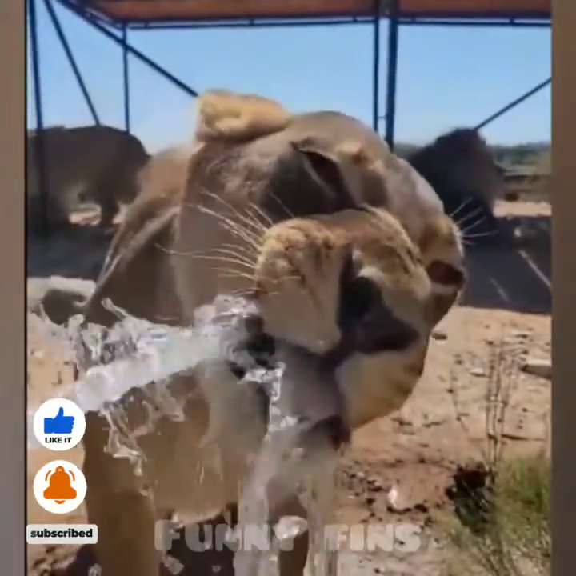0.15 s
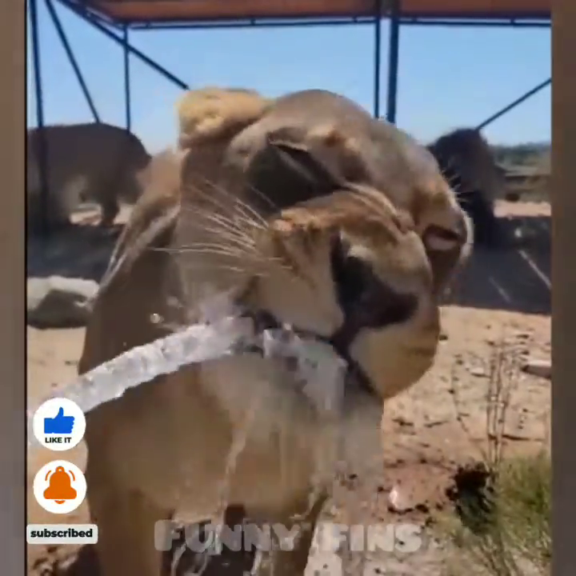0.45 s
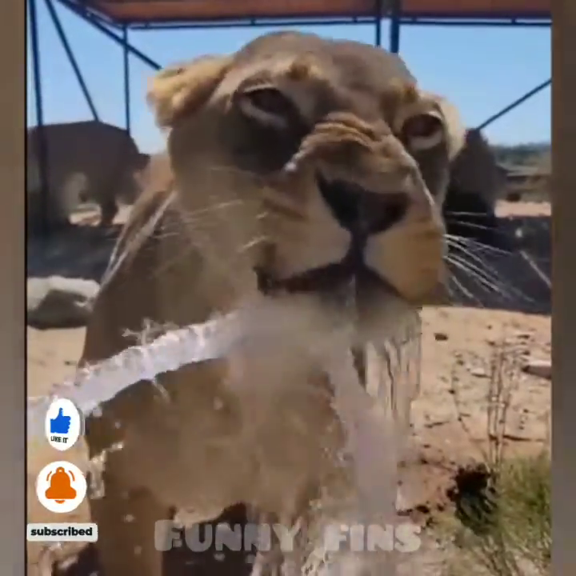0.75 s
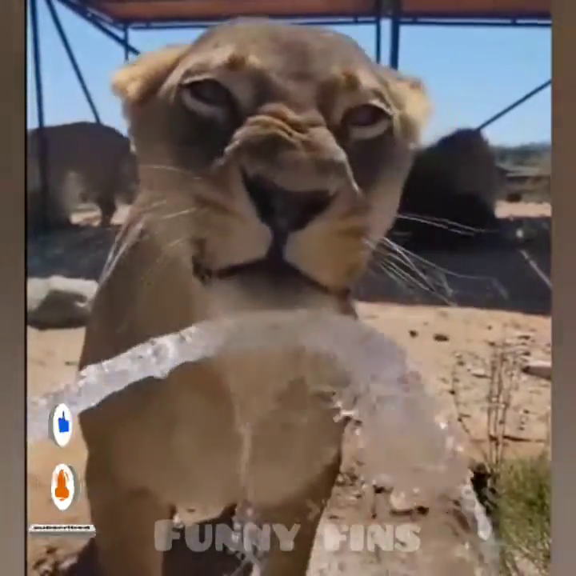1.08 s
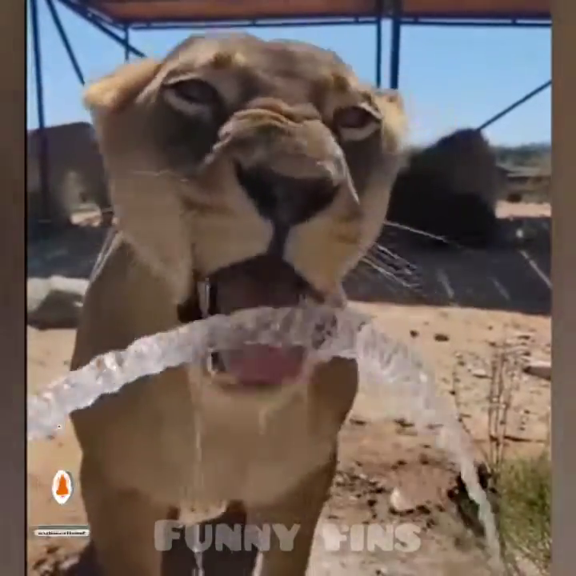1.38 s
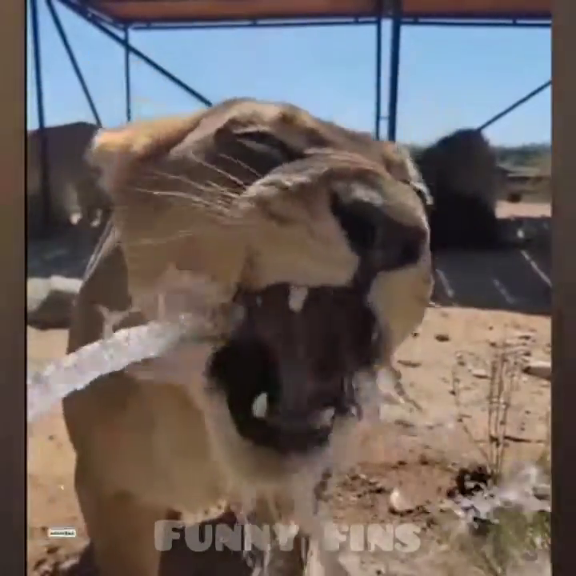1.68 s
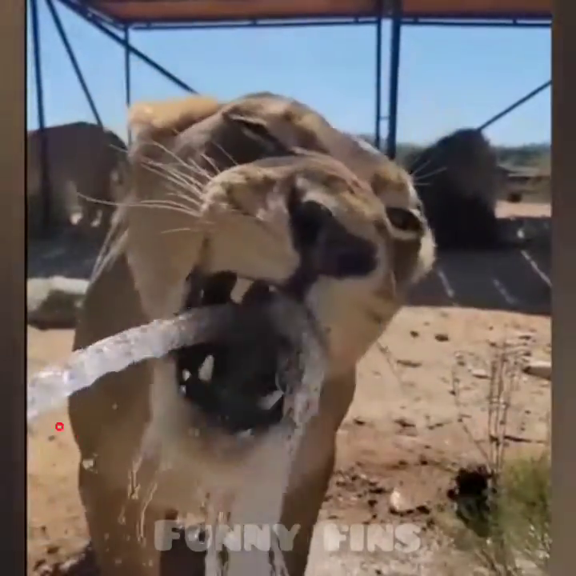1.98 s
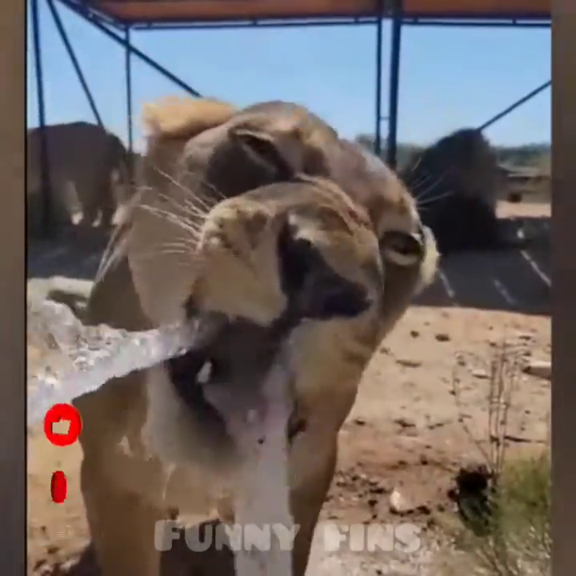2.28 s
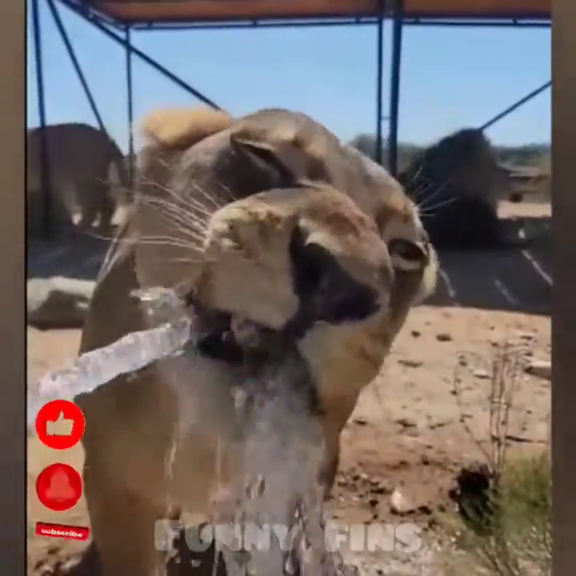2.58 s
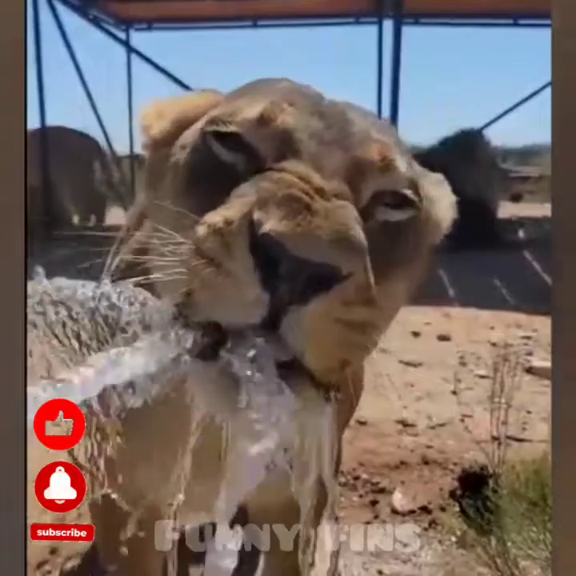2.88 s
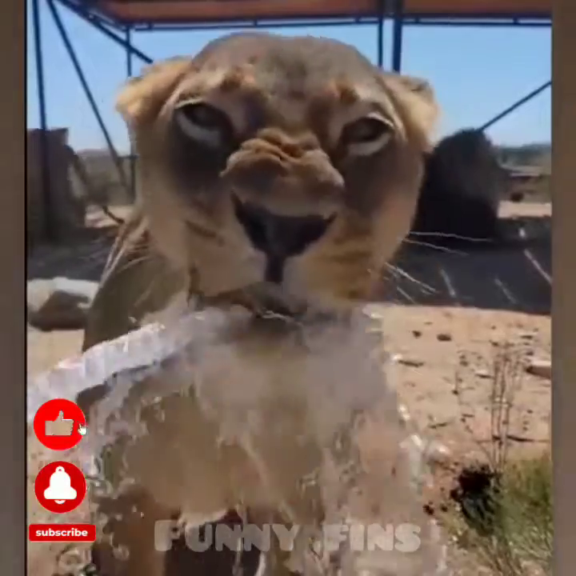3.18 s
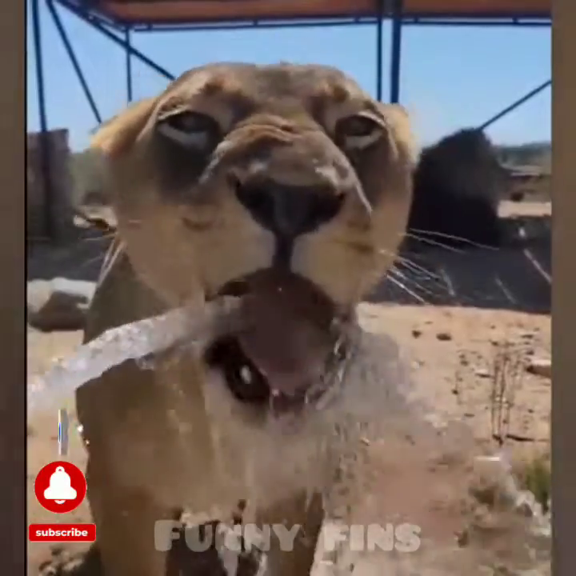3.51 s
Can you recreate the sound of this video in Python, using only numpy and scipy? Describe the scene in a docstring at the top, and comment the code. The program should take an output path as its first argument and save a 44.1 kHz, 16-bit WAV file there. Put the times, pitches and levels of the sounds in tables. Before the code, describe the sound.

A hose jet splashes unevenly on a lioness's muzzle, close and outdoors: hissing spray, wet ticks and sharp slaps throughout, gurgles early, a hollow ringing mouthful midway, then more gurgling and splatter, leaning right.

```python
"""A hose jet plays on the wet muzzle of a lioness outdoors and bursts into a mist of hissing spray.
Wet ticks and small ringing bubbles splatter on fur and lips, and larger bubbles gurgle in her cheek.
For a while filtered drops ring her open mouth like a hollow; lumps of water slap as ringing noise bursts.
Single bubbles plop with rising pitch and soft thuds sag, over a faint low rumble and a wavering hum."""
import sys
import numpy as np
from scipy import signal
from scipy.fft import rfft, irfft
from scipy.io import wavfile

SR = 44100
rng = np.random.default_rng(int(sys.argv[2]) if len(sys.argv) > 2 else 0)


def log_audio(samples):
    """Write samples as a 16-bit WAV file to the path given in sys.argv[1]."""
    # one column per channel
    frames = np.atleast_2d(samples).T
    # limit to full scale, then quantise
    limited = np.clip(frames, -1, 1)
    pcm = np.round(limited * 32767).astype(np.int16)
    wavfile.write(sys.argv[1], SR, pcm)


N = 160965
T = np.arange(N) / SR


def amp(db):
    """Turns decibels into a gain."""
    return 10 ** (np.asarray(db) / 20)


def unit(x):
    """Scales a sound to an average strength (rms) of 1."""
    return x / np.sqrt(np.mean(x ** 2) + 1e-20)


def curve(table, axis=1):
    """Draws straight lines through one column of a time table, giving a value for every sample."""
    rows = np.array(table)
    return np.interp(T, rows[:, 0], rows[:, axis])


def spectrum(points):
    """Joins the points of a frequency table, giving a value for every frequency bin."""
    hz, value = np.transpose(points)
    bins = np.fft.rfftfreq(N, 1 / SR)
    return np.interp(np.log(bins + 1), np.log(hz), value)


def add(mix, start_s, sound):
    """Mixes a sound in at a given time, cutting it off at the end of the mix."""
    part = mix[:, round(start_s * SR):][:, :sound.shape[-1]]
    part += sound[..., :part.shape[1]]


def coloured(x, colour):
    """Makes some frequencies louder and others softer, then scales to rms 1."""
    return unit(irfft(rfft(x) * amp(spectrum(colour)), N))


# how alike the left and right noise are: (frequency [Hz], likeness [0 to 1])
EAR_LIKENESS = [(60, 0.94), (130, 0.99), (290, 0.51), (640, 0.42), (3100, 0.32), (6820, 0.49),
                (15000, 0.82)]


def noise(colour, envelope=1):
    """Shapes stereo noise in time, makes the ears partly alike, then colours it."""
    left, other = rfft(rng.standard_normal((2, N)) * envelope)
    alike = np.clip(spectrum(EAR_LIKENESS), 0, 1)
    right = alike * left + np.sqrt(1 - alike ** 2) * other
    return coloured(irfft(np.array([left, right]), N), colour)


def wander(hz):
    """Drifts smoothly at random, with little movement faster than the given rate."""
    bins = np.fft.rfftfreq(N, 1 / SR)
    return unit(irfft(rfft(rng.standard_normal(N)) / (1 + (bins / hz) ** 4), N))


def drops(per_s, spread_db):
    """Scatters impacts at random times; a positive spread makes a few large, a negative one a few small."""
    hits = rng.random(N) < per_s / SR
    return hits * amp(spread_db * np.minimum(rng.exponential(1, N), 4))


def bubble(t, hz, decay_s, rise_per_s, phase=0):
    """A pocket of air rings and rises in pitch as it dies away."""
    swell = 1 - np.exp(-2 * t * hz)
    turns = hz * t * (1 + rise_per_s * t / 2)
    return swell * np.exp(-t / decay_s) * np.sin(2 * np.pi * turns + phase)


def bubbles(low_hz, high_hz, per_s, spread_db, cycles, glide, scatter, count=40):
    """Bubbles of many sizes ring at many pitches, each size with its own phase (radians) in each ear."""
    out = np.zeros((2, N))
    for hz in np.linspace(low_hz, high_hz, count):
        decay_s = cycles / hz * np.exp(rng.uniform(-0.47, 0.78))
        t = np.arange(0, 6 * decay_s, 1 / SR)
        phase = scatter * rng.standard_normal((2, 1))
        ring = bubble(t, hz, decay_s, glide / decay_s, phase) / np.sqrt(decay_s)
        hits = drops(per_s / count, spread_db)
        out += signal.oaconvolve(hits[None], ring, axes=1)[:, :N]
    return unit(out)


def resonate(x, hz, width_hz):
    """A hollow rings at a moving pitch: shift that pitch to zero, smooth twice, shift back."""
    turn = np.exp(2j * np.pi * np.cumsum(hz) / SR)
    r = np.exp(-np.pi * width_hz / SR)
    smooth = signal.lfilter([1], [1, -2 * r, r * r], x / turn)
    return unit((turn * smooth).real)


def patchy(x, depth_db, wide_hz, long_s):
    """The colour shifts in random patches of pitch and time as the water changes shape."""
    hz, t, z = signal.stft(x, SR, nperseg=1024, noverlap=768)
    along_hz = np.fft.fftfreq(len(hz), hz[1])[:, None]
    along_s = np.fft.fftfreq(len(t), t[1])
    blur = np.exp(-2 * (along_hz * wide_hz) ** 2 - 2 * (along_s * long_s) ** 2)
    field = unit(np.fft.ifft2(np.fft.fft2(rng.standard_normal(z.shape[1:])) * blur).real)
    z = z * amp(depth_db * np.minimum(field, 2))
    return unit(signal.istft(z, nperseg=1024, noverlap=768)[1][:, :N])


# colour of the low outdoor rumble: (frequency [Hz], relative level [dB])
RUMBLE_TONE = [(15, -6), (35, -20), (62, 3.5), (90, -4), (125, -13), (250, -31), (2000, -46)]
# low bumps of air that swell the rumble: (time [s], level [dB])
AIR_BUMPS = [(.81, -50.5), (3.29, -48)]
RUMBLE_DB, BUMP_WIDTH_S = -59.5, 0.039
HUM_DB, HUM_HZ = -63, 88.8


def background():
    """Low noise rumbles and swells in brief bumps of air, beside a faint hum of wavering pitch."""
    hum = np.sin(2 * np.pi * np.cumsum(HUM_HZ + 2.2 * wander(hz=8.6)) / SR)
    bumps = sum(amp(db) * np.exp(-((T - s) / BUMP_WIDTH_S) ** 2) for s, db in AIR_BUMPS)
    rumble = (amp(RUMBLE_DB) + bumps) * noise(RUMBLE_TONE)
    return rumble + amp(HUM_DB) * unit(hum)


# large single bubbles: (time [s], starting pitch [Hz], level [dB])
SINGLE_BUBBLES = [(.066, 517, -25), (0.224, 1800, -21), (1.587, 520, -31.5), (1.646, 545, -34),
                  (2.0, 1360, -27.5), (2.02, 723, -25.5), (2.183, 1270, -24.5), (2.953, 1090, -28),
                  (3.586, 612, -32)]
# soft thuds of water on the cheek: (time [s], starting pitch [Hz], relative level [dB])
CHEEK_THUDS = [(0.156, 190, -35), (0.547, 213, -33.5), (3.232, 161, -24.5)]
PLOP_DECAY_S, PLOP_RISE_PER_S = 0.01, 2.23
THUD_DECAY_S, THUD_SAG_S = 0.0069, 0.17


def plops_and_thuds():
    """Single large bubbles rise in pitch; blows on the soft cheek sag in pitch."""
    out, t = np.zeros((2, N)), T[:SR // 10]
    for s, hz, db in SINGLE_BUBBLES:
        phase = rng.uniform(-2.1, 1, (2, 1))
        add(out, s, amp(db) * bubble(t, hz, PLOP_DECAY_S, PLOP_RISE_PER_S, phase))
    for s, hz, db in CHEEK_THUDS:
        turns = hz * THUD_SAG_S * np.log1p(t / THUD_SAG_S)
        swell = 2 * t / THUD_DECAY_S * np.exp(-2 * t / THUD_DECAY_S)
        add(out, s, amp(db) * swell * 2 * np.sin(2 * np.pi * turns))
    return out


# larger bubbles in the cheek, before the trim: (time [s], level [dB])
CHEEK_BUBBLES = [(0, -36), (.2, -36.5), (.32, -56), (.4, -44.5), (.46, -51), (.55, -37.5), (.63, -31),
                 (.76, -43.5), (.92, -49.5), (1.18, -59), (1.35, -49), (1.77, -59), (2.15, -52),
                 (2.28, -36), (2.38, -38.5), (2.46, -45.5), (2.53, -38.5), (2.68, -36.5), (2.83, -37),
                 (3.0, -47.5), (3.13, -60), (3.23, -43), (3.43, -45), (3.57, -37.5), (3.65, -53)]
# the jet drumming on flesh, before the trim: (time [s], level [dB])
FLESH_DRUM = [(0, -47), (.17, -41.5), (.3, -51.5), (.55, -50.5), (.8, -47), (.95, -59), (1.1, -51),
              (1.28, -57.5), (1.5, -52.5), (2.2, -61.5), (2.38, -46.5), (2.56, -52.5), (2.75, -44),
              (3.13, -57.5), (3.28, -49.5), (3.6, -41)]
# colours of the bubbles and the drumming: (frequency [Hz], relative level [dB])
BUBBLE_TONE = [(150, -16), (300, 0), (650, 4), (1400, 6), (2200, -4), (4000, -30)]
DRUM_TONE = [(40, -31), (110, -4.5), (170, 0), (280, 1.5), (400, -1), (700, -5.5), (1500, -20.5)]
BUBBLE_TRIM_DB, DRUM_TRIM_DB = -2, -1.5


def churn():
    """Larger bubbles gurgle in the cheek while many low impacts of the jet drum on flesh."""
    gurgle = bubbles(305.6, 1690, per_s=900, spread_db=1.5, cycles=7.5, glide=0.0615, scatter=1.08)
    gurgle = patchy(coloured(gurgle, BUBBLE_TONE), depth_db=3.5, wide_hz=150, long_s=0.042)
    drum = noise(DRUM_TONE, drops(per_s=500, spread_db=0.0))
    gurgle_gain = amp(curve(CHEEK_BUBBLES) + BUBBLE_TRIM_DB)
    return gurgle_gain * gurgle + amp(curve(FLESH_DRUM) + DRUM_TRIM_DB) * drum


# the jet in the open mouth: (time [s], lowest resonance before wobble [Hz], level [dB])
MOUTH_PATH = [(1.53, 517, -48.5), (1.68, 576, -55), (1.78, 660, -66), (1.85, 596, -37), (1.96, 566, -42),
              (2.01, 717, -39.5), (2.06, 657, -33), (2.17, 635, -36.5), (2.23, 600, -36), (2.32, 597, -44),
              (2.52, 680, -62), (2.68, 627, -38.5), (2.79, 560, -55)]
# resonances of the mouth: (multiple of the lowest [ratio], width setting [Hz], relative level [dB])
MOUTH_RESONANCES = [(1, 70, -3), (1.5, 180, -3.5), (2.1, 161, -6.5), (2.9, 170, -3.5)]
# colour of the drops that ring the mouth: (frequency [Hz], relative level [dB])
MOUTH_TONE = [(380, -14.5), (540, -4), (2500, -4)]


def mouth(slosh_hz=22, slosh_db=1.5, wobble=0.043):
    """Drops ring the hollow mouth; sloshing bends and swells each resonance, the upper ones bending most."""
    drive = noise(MOUTH_TONE, drops(per_s=1200, spread_db=2.2))
    lowest_hz = curve(MOUTH_PATH)
    hollow = 0
    for multiple, width_hz, db in MOUTH_RESONANCES:
        gain = amp(db + slosh_db * wander(slosh_hz))
        bend = 1 + wobble * multiple * wander(slosh_hz)
        hollow = hollow + gain * resonate(drive, lowest_hz * multiple * bend, width_hz)
    inside = (T > MOUTH_PATH[0][0]) * (T < MOUTH_PATH[-1][0])
    return unit(hollow) * amp(curve(MOUTH_PATH, axis=2)) * inside


# lumps that slap the muzzle, before ring and smack trims:
# (time [s], pitch [Hz], smack level [dB], fizz level [dB])
WATER_SLAPS = [(0.158, 2820, -24.5, -18), (.432, 2150, -21, -24), (.532, 1730, -22, -20),
               (0.577, 1870, -16.5, -39), (.901, 1500, -20, -16.5), (1.057, 2550, -14, -28),
               (1.069, 2600, -17.5, -32), (1.074, 3320, -28, -26), (1.16, 2370, -19, -18.5),
               (1.217, 2720, -22.5, -19), (1.292, 2770, -21, -25), (1.943, 2640, -20.5, -20.5),
               (1.966, 2450, -21.5, -27), (2.136, 2420, -23.5, -24), (2.226, 3000, -20.5, -33),
               (2.249, 2770, -22.5, -34), (2.457, 2400, -26, -16), (2.647, 3330, -20, -24),
               (2.714, 2670, -24, -24), (2.752, 2840, -18.5, -37), (2.865, 5700, -21.5, -17.5),
               (3.089, 1920, -21.5, -25), (3.102, 3250, -19, -19), (3.148, 2640, -20.5, -37),
               (3.236, 1800, -21.5, -17.5), (3.377, 3740, -22.5, -20.5)]
# colour of the smack noise: (frequency [Hz], relative level [dB])
SMACK_TONE = [(200, -17), (900, -48), (1600, 2.5), (2600, 11), (3600, 5), (5500, 1.5), (12000, -7.5)]
SLAP_RISE_S, SLAP_DECAY_S, SLAP_RING_S = 0.00046, 0.0043, 0.00073
SLAP_TAIL_S, SLAP_TAIL_DB = 0.039, -25


def slaps(ring_db=-0.5, smack_db=-3):
    """A lump of water lands with a briefly ringing smack and a fizz, then a short trail of droplets."""
    out, t = np.zeros((2, N)), T[:SR // 10]
    smack, fizz = amp(smack_db) * noise(SMACK_TONE), noise(SPRAY_TONE)
    fade = np.exp(-t / SLAP_DECAY_S) + amp(SLAP_TAIL_DB) * np.exp(-t / SLAP_TAIL_S)
    envelope = np.minimum(t / SLAP_RISE_S, 1) * fade
    ring_shape = amp(ring_db) * t / SLAP_RING_S * np.exp(1 - t / SLAP_RING_S)
    for s, hz, db, fizz_db in WATER_SLAPS:
        at = rng.integers(N - len(t)) + np.arange(len(t))  # a random stretch of the noise
        ring = ring_shape * np.sin(2 * np.pi * hz * t + rng.uniform(-0.16, 1, (2, 1)))
        hit = amp(db) * (ring + envelope * smack[:, at])
        add(out, s, hit + amp(fizz_db) * envelope * fizz[:, at])
    return out


# splatter on fur and lips, before trim and surge: (time [s], level [dB])
SPLATTER_LEVEL = [(0, -27.5), (.2, -26.5), (.32, -38.5), (.44, -27), (.57, -25), (.7, -28), (.88, -32.5),
                  (1.04, -34.5), (1.08, -31), (1.17, -25.5), (1.27, -37.5), (1.41, -40.5), (1.55, -38),
                  (1.71, -41.5), (1.82, -28.5), (1.93, -39), (1.98, -28.5), (2.15, -31), (2.2, -39),
                  (2.27, -32), (2.48, -28), (2.66, -31), (2.77, -28), (2.88, -31.5), (2.97, -39.5),
                  (3.085, -32.5), (3.11, -31), (3.21, -30.5), (3.24, -24), (3.32, -38), (3.43, -27.5),
                  (3.48, -32.5), (3.57, -25), (3.65, -37)]
# colour of the splatter: (frequency [Hz], relative level [dB])
SPLATTER_TONE = [(700, -56), (1200, -12), (1650, -3), (2700, -2.5), (3400, -4), (4400, -5), (7000, -10.5),
                 (12000, -2)]
SPLATTER_TRIM_DB, TINKLE_DB = -3.5, -3.5


def splatter(surge, surge_db=1.14):
    """Short wet ticks and ringing small bubbles sound where the jet breaks on fur and lips."""
    ticks = bubbles(1256, 7170, per_s=3500, spread_db=1.5, cycles=2.4, glide=0.023, scatter=0.98, count=56)
    tinkle = bubbles(1419, 4318, per_s=260, spread_db=1.5, cycles=22.2, glide=0.022, scatter=1.29, count=64)
    wet = coloured(ticks + amp(TINKLE_DB) * tinkle, SPLATTER_TONE)
    wet = patchy(wet, depth_db=1.5, wide_hz=252, long_s=0.02)
    return wet * amp(curve(SPLATTER_LEVEL) + SPLATTER_TRIM_DB + surge_db * surge)


# fine spray, before trim and surge: (time [s], level [dB])
SPRAY_LEVEL = [(0, -21.5), (.09, -31), (.16, -25), (.25, -30), (.34, -34.5), (.39, -26), (.46, -30.5),
               (.52, -32), (.55, -28), (.66, -26.5), (.8, -30), (.92, -30), (1.04, -35), (1.09, -26),
               (1.2, -27), (1.42, -30), (1.46, -26.5), (1.53, -31), (1.74, -35.5), (1.83, -32),
               (1.935, -32.5), (1.97, -30), (2.2, -34), (2.42, -28), (2.5, -24.5), (2.54, -29.5),
               (2.68, -30.5), (2.74, -27), (2.81, -26), (2.855, -28.5), (2.88, -25.5), (2.93, -29.5),
               (3.21, -30.5), (3.24, -27), (3.33, -30.5), (3.39, -28), (3.53, -30), (3.575, -22.5),
               (3.65, -33)]
# colour of the spray hiss and of the fizz in the slaps: (frequency [Hz], relative level [dB])
SPRAY_TONE = [(500, -33), (1100, -54), (1600, -8), (2700, 2), (4000, -1.5), (5200, -2), (6400, 0),
              (7100, 2.5), (8500, -2), (10500, -3.5), (12500, 1.5), (15800, -3)]
SPRAY_TRIM_DB, FIZZ_DB = 0.5, -15


def spray(surge, per_s=1500, spread_db=3, burst_s=0.0017, mist=1.0, surge_db=1.5):
    """Each droplet bursts in a tiny puff; the finest merge into a steady mist, and tiny bubbles fizz."""
    power = signal.lfilter([1], [1, -np.exp(-1 / (burst_s * SR))], drops(per_s, spread_db) ** 2)
    hiss = noise(SPRAY_TONE, np.sqrt(power / power.mean() + mist))
    fizz = bubbles(3533, 15260, per_s=1000, spread_db=-3.0, cycles=22, glide=0.022, scatter=0.32, count=80)
    fine = patchy(hiss + amp(FIZZ_DB) * fizz, depth_db=2.5, wide_hz=350, long_s=0.026)
    return fine * amp(curve(SPRAY_LEVEL) + SPRAY_TRIM_DB + surge_db * surge)


# hard surfaces near the jet: (delay [s], level [dB])
NEARBY_ECHOES = [(0.0122, -15)]


def surroundings(x):
    """Hard surfaces nearby return a faint, early copy of the sound."""
    out = x.copy()
    for delay_s, db in NEARBY_ECHOES:
        add(out, delay_s, amp(db) * x)
    return out


# balance of the water between the ears: (frequency [Hz], left minus right [dB])
LEFT_RIGHT = [(150, 1.5), (380, -5), (1290, -5), (2380, -4), (4400, -1.2), (8120, -3), (15000, -6)]


def scene():
    """One uneven flow drives spray and splatter; all the water sits mostly to the right."""
    surge = wander(hz=38)
    water = spray(surge) + splatter(surge) + churn() + mouth() + slaps() + plops_and_thuds()
    pan = amp(np.array([[.5], [-.5]]) * spectrum(LEFT_RIGHT))
    return surroundings(irfft(rfft(water) * pan, N)) + background()


CUTOFF_HZ = 15950


def record(dry):
    """A steep low-pass filter removes the highest treble."""
    lowpass = signal.firwin(511, CUTOFF_HZ, window=("kaiser", 8), fs=SR)
    return signal.oaconvolve(dry, lowpass[None], "same")


dry = scene()
out = record(dry)
log_audio(out)
```